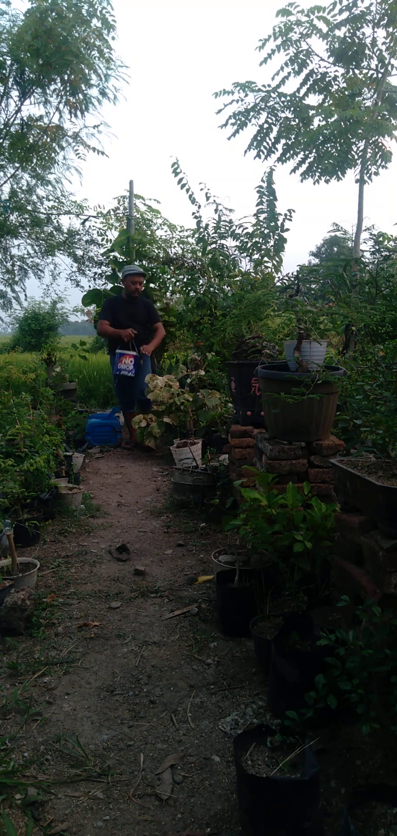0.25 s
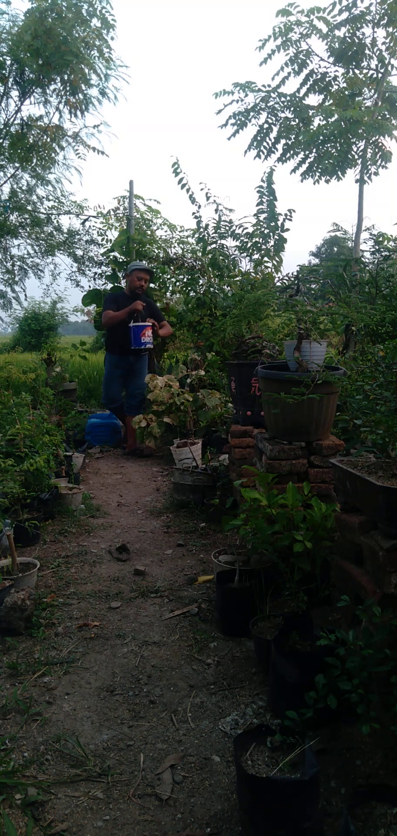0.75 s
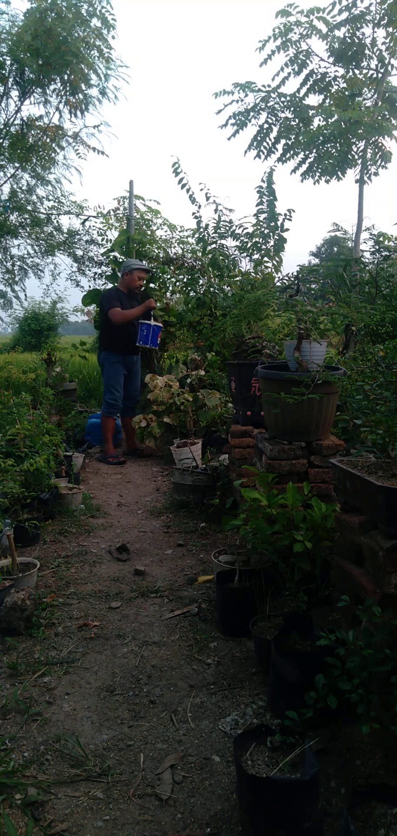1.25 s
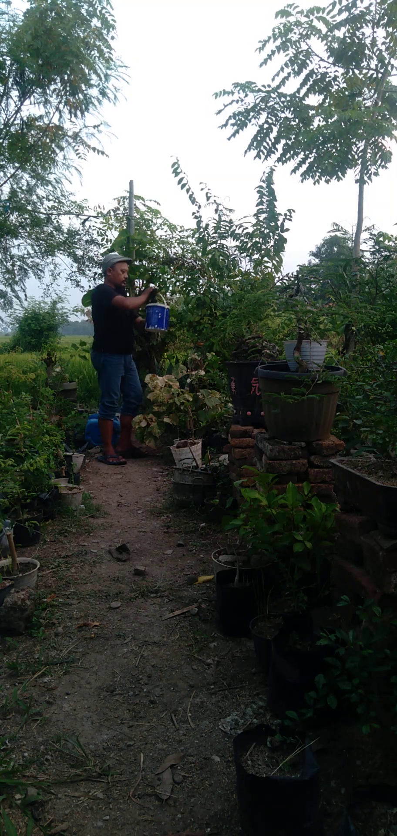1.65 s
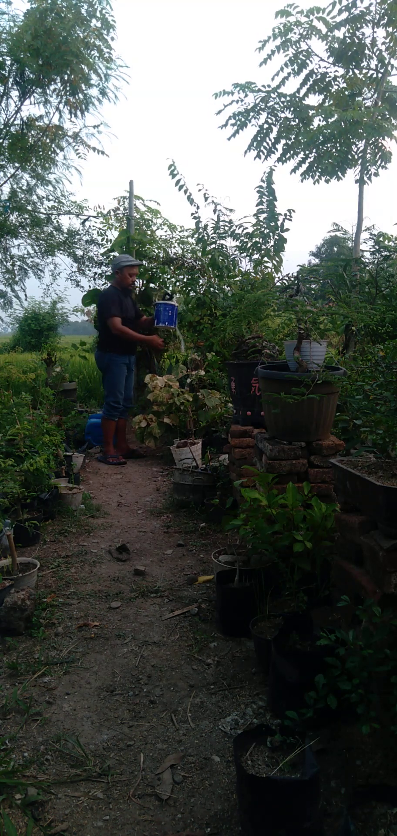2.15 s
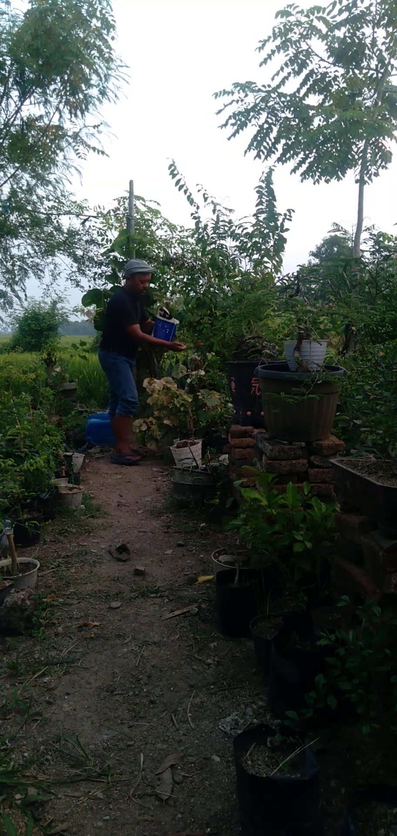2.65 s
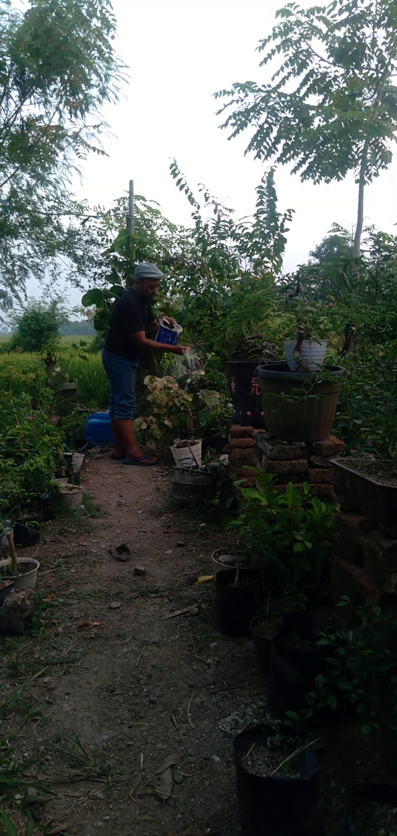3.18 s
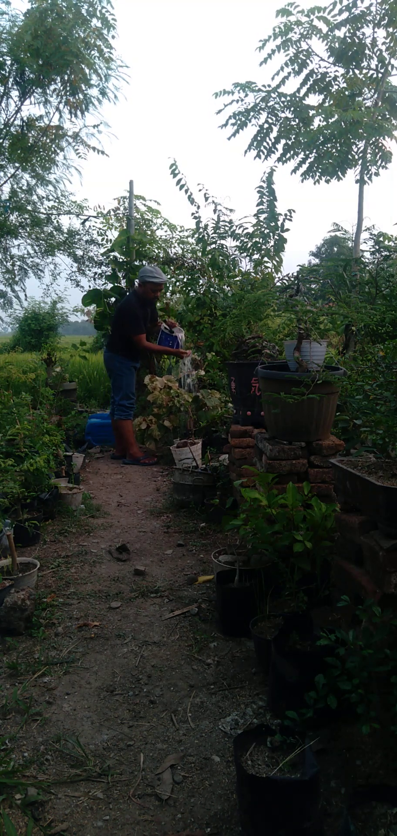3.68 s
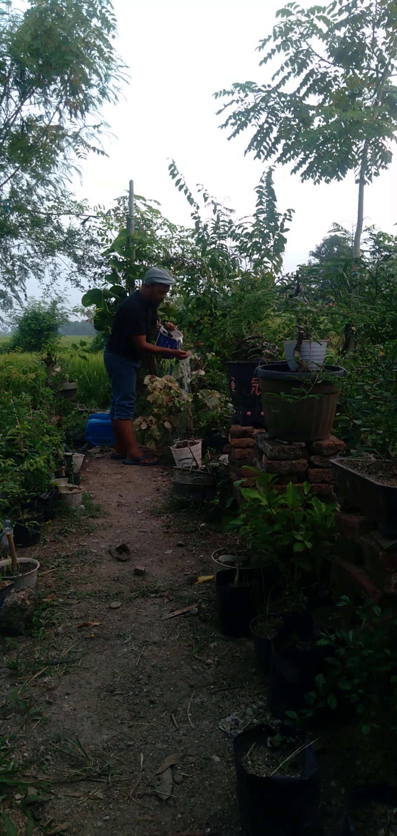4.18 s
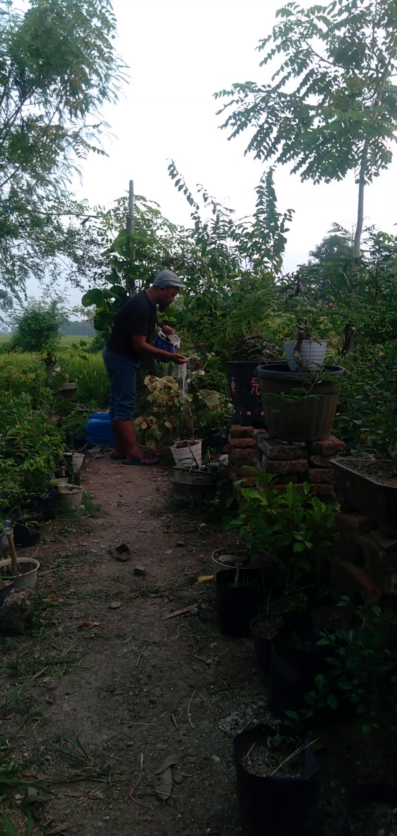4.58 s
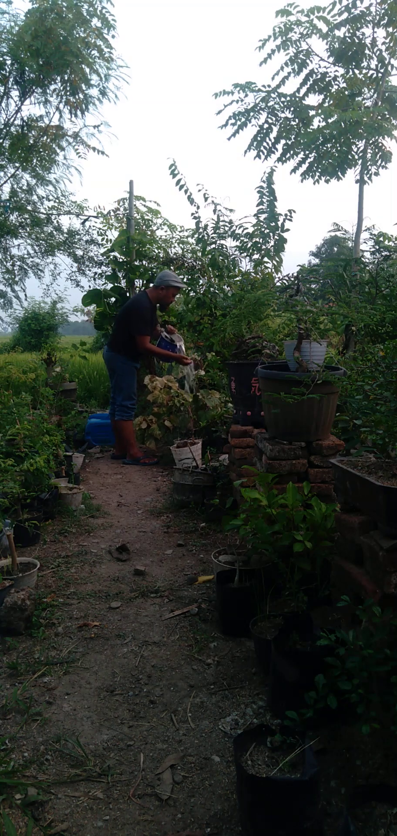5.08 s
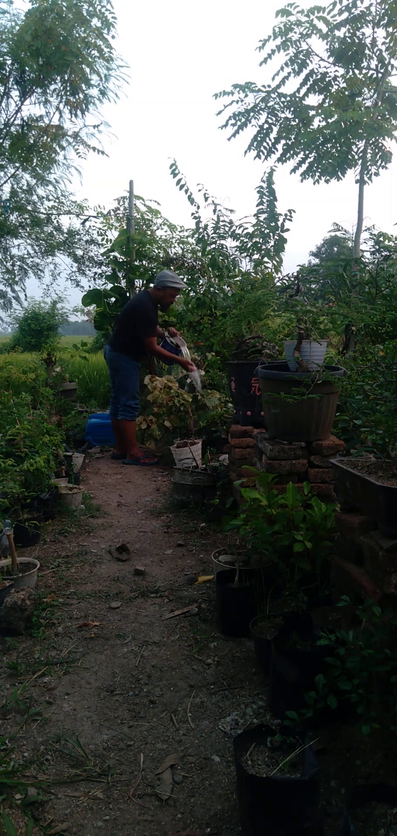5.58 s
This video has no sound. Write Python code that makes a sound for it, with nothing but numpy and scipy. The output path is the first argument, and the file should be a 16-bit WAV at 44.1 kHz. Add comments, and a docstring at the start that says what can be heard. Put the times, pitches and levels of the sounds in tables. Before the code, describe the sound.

Fast steady insect trilling outdoors, with a creaking bucket handle, a hollow plastic knock, and splashes of water pattering onto leaves and soil.

```python
"""A cricket close to the microphone chirps eight times a second while a second one buzzes higher and farther off.
Soft low gusts and a thin high insect hiss lie underneath in the garden.
A few metres away a plastic bucket knocks, its handle creaks, and water is tossed, then poured, over plants.
Crickets are rings struck by wing catches, water is dense random drop impacts, and the bucket is decaying
and squeaking tones; gusts, air and hiss are coloured noise."""
import sys
import numpy as np
from scipy import signal
from scipy.fft import rfft, irfft
from scipy.io import wavfile
from scipy.ndimage import uniform_filter1d

SR = 44100
rng = np.random.default_rng(int(sys.argv[2]) if len(sys.argv) > 2 else 0)


def digitize_waveform(pressure):
    """Quantize a signal to 16-bit integers and store it at the path in sys.argv[1].

    Rows of a 2-D input are taken as channels; values are limited to [-1, 1].
    """
    field = np.atleast_2d(pressure).T
    bounded = np.clip(field, -1, 1)
    quanta = np.round(bounded * 32767).astype(np.int16)
    wavfile.write(sys.argv[1], SR, quanta)


N = 257103
TIME = np.arange(N) / SR  # seconds


def amp(db):
    """Decibels to gain."""
    return 10 ** (np.asarray(db) / 20)


def evened(x):
    """Scales to rms 1."""
    return x / np.sqrt(np.mean(x ** 2) + 1e-20)


def colour(x, points):
    """Filters by a spectrum of (Hz, dB) points; beyond its ends the gain is -100 dB."""
    f, db = np.transpose(sorted(map(tuple, points)))
    hz = np.fft.rfftfreq(len(x), 1 / SR)
    gain = amp(np.interp(np.log(hz + 1), np.log(f), db, left=-100, right=-100))
    return irfft(rfft(x) * gain, len(x))


def noise(points):
    """Noise of rms 1 with the given spectrum."""
    return evened(colour(rng.standard_normal(N), points))


def wander(per_s):
    """Smooth chance of rms 1 that changes about per_s times a second."""
    lowpass = np.exp(-(np.fft.rfftfreq(N, 1 / SR) / per_s) ** 2)
    return evened(irfft(rfft(rng.standard_normal(N)) * lowpass, N))


def curves(rows):
    """Each column of a timed table, sample by sample."""
    s, *columns = np.transpose(rows)
    return [np.interp(TIME, s, column) for column in columns]


def add(mix, s, sound):
    """Lays a sound into the mix, starting at s."""
    at = round(s * SR)
    sound = sound[max(-at, 0):]
    part = mix[max(at, 0):][:len(sound)]
    part += sound[:len(part)]


def hump(middle, length):
    """A smooth bell-shaped swell of height 1."""
    return np.exp(-(2 * (TIME - middle) / length) ** 2)


def together(gains):
    """Independent sounds add in power."""
    return np.sqrt(sum(g ** 2 for g in gains))


def garden(x, wet_db, t60):
    """Adds the short scatter from pots, walls and foliage: sparse random echoes that die away."""
    t = np.arange(SR // 2) / SR
    sparse = rng.standard_normal(len(t)) * (rng.random(len(t)) < .1)
    taps = sparse * amp(-60 * t / t60) * (t > .003)
    return x + amp(wet_db) * signal.fftconvolve(x, evened(taps) / np.sqrt(len(t)))[:N]


# In one stroke the wing catches ever faster, and its force swells and fades about the middle.
FIRST_CATCH_S, FIRST_GAP_S, LAST_GAP_S = -.0368, .0098, .004
QUICKEN = .68  # share of the excess gap left after each catch
SWELL_S, FADE_S = 0.036, 0.024


def stroke(jitter_s=0.0003027, return_db=-21, count=27):
    """Times (s from the middle) and forces of the wing catches; a faint rasp remains as the wing slides back."""
    gaps = LAST_GAP_S + (FIRST_GAP_S - LAST_GAP_S) * QUICKEN ** np.arange(count)
    at = FIRST_CATCH_S + np.cumsum(gaps) - gaps + jitter_s * rng.standard_normal(count)
    force = np.exp(-np.where(at < 0, (at / SWELL_S) ** 4, (at / FADE_S) ** 2))
    return at, np.maximum(force, amp(return_db))


# Narrow tones that linger after each catch. Each row: pitch in Hz, relative level in dB.
LINGER = [(6336, -52.5), (6422, -45), (6481, -43.5), (6525, -46), (6568, -66.5), (6735, -67), (6826, -43),
          (6874, -48), (6918, -58.5)]


def lingering(x, ring_db=-2, t60=0.13):
    """Adds the narrow tones that ring on after each catch, as decaying resonances."""
    t = np.arange(SR // 4) / SR
    out = x.copy()
    for hz, db in LINGER:
        ring = amp(-60 * t / t60) * np.cos(2 * np.pi * hz * t)
        out += amp(db + ring_db) * evened(signal.oaconvolve(x, ring)[:N])
    return out


# Ring of the near cricket's wing. Each row: frequency in Hz, relative level in dB.
WING = [(5800, -52), (6000, -42), (6100, -26), (6180, -11), (6330, -2), (6480, 0), (6750, 0), (6920, -3),
        (7030, -21), (7150, -9), (7330, -30), (7600, -18), (7750, -32), (8000, -60)]
# Even beats, each at its own pace. Each row: first chirp in seconds, number of chirps, gap in seconds.
CHIRP_RUNS = [(-.005, 9, .1199), (1.071, 5, .1192), (1.67, 6, .1207), (2.39, 8, .1215), (3.368, 6, .1244),
              (4.106, 13, .121), (5.783, 1, .121)]
# Effort of the near cricket. Each row: time in seconds, relative chirp level in dB.
EFFORT = [(0, -38), (2.2, -38.5), (2.7, -39.5), (3.3, -39), (4.6, -40), (5.8, -40.5)]


def cricket(wing_hz=6550, slip_rad=0.95, level_db=-7.0, ring_s=0.00021, chorus_db=-48.5):
    """Every chirp repeats the same run of wing catches; each catch rings the wing for a moment."""
    t, out = np.arange(-2048, 5120) / SR, np.zeros(N)
    at, force = stroke()
    age = t - at[:, None]
    rings = np.exp(-.5 * (age / ring_s) ** 2 + 2j * np.pi * wing_hz * age)
    for first, gap_count, gap in CHIRP_RUNS:
        for s in first + gap * np.arange(gap_count):
            slip = rng.standard_normal(len(at))  # each catch slips in phase
            catches = force * np.exp(1j * slip_rad * slip)
            db = np.interp(s, *np.transpose(EFFORT)) + level_db
            add(out, s + t[0], amp(db) * evened(colour((catches @ rings).real, WING)))
    near = garden(lingering(out), wet_db=-13, t60=.3)
    return near + amp(chorus_db) * noise(WING)  # a steady wash in the same band


# Ring of the far cricket's wing. Each row: frequency in Hz, relative level in dB.
FAR_WING = [(7300, -30), (7520, -15), (7590, -7), (7690, -18), (7830, 1), (7890, -9), (7955, -1),
            (8030, -11), (8115, 0), (8200, -16), (8320, -45)]
# Where it falters, or swells if the drop is negative. Each row: middle in seconds, length in seconds, drop in dB.
FALTERS = [(0.046, 0.18, -2), (1.336, 0.06, 12), (2.076, 0.18, 6), (2.343, 0.086, 2), (2.765, .14, 11),
           (3.407, 0.18, 22), (4.23, 0.13, 16.5)]
FAR_DB, FAR_GROWTH_DB_PER_S = -49.5, 0.17  # level at the start; it slowly warms up
FAR_HZ, FAR_DRIFT_HZ = 8066, 73  # mean pitch, rms drift


def far_cricket(catch_hz=150, flutter_db=2.5):
    """A fluttering buzz of quick wing catches, each a decaying burst of a drifting tone, heard from afar."""
    falter = sum(drop * hump(s, length) for s, length, drop in FALTERS)
    db = FAR_DB + FAR_GROWTH_DB_PER_S * TIME + flutter_db * wander(9.7) - falter
    hz = FAR_HZ + FAR_DRIFT_HZ * wander(17)
    turns = np.cumsum(catch_hz * (1 + .15 * wander(50))) / SR
    ring = np.sin(2 * np.pi * np.cumsum(hz) / SR + 1.5 * wander(90))
    catches = np.exp(-(turns % 1) / .4) * ring * amp(3.5 * wander(30))
    return amp(db) * evened(colour(catches, FAR_WING))


def gust(points, steadiness=1.0):
    """Low noise whose swells are partly smoothed out."""
    x = noise(points)
    power = uniform_filter1d(x ** 2, SR // 16) + 1e-3
    return evened(x / power ** (steadiness / 2))


# Colours of the deep rumble and the hollow boom. Each row: frequency in Hz, relative level in dB.
RUMBLE = [(15, -11), (32, -23), (50, 3), (75, 6.5), (100, 2.5), (140, -34), (300, -65)]
BOOM = [(70, -50), (110, -18.5), (128, 3), (143, -6), (159, 5), (177, -11.5), (195, -2), (220, -16),
        (300, -28.5), (500, -78)]
# Soft low gusts. Each row: middle in seconds, length in seconds, deep rumble in dB, hollow boom in dB.
PUFFS = [(1.55, 0.16, -54.5, -64), (1.718, 0.071, -48.5, -60.5), (1.802, 0.11, -51, -70),
         (2.312, 0.095, -66, -54.5), (2.522, 0.052, -57, -65), (2.72, 0.11, -75, -55.5),
         (2.947, 0.092, -56, -43.5), (3.089, 0.08, -62, -47.5), (3.275, .12, -55, -49),
         (3.59, 0.081, -46.5, -45.5), (3.723, 0.14, -56, -50), (3.942, 0.087, -50, -49),
         (4.094, 0.13, -59, -50.5), (4.37, 0.083, -56, -58), (4.46, 0.18, -67, -49.5),
         (4.86, 0.089, -59, -50), (4.922, .09, -46.5, -59), (5.035, 0.18, -55.5, -48),
         (5.324, 0.11, -60, -46), (5.445, 0.22, -53.5, -59), (5.675, 0.057, -69, -54.5),
         (5.82, 0.12, -49.5, -57)]
CALM_RUMBLE_DB, CALM_BOOM_DB = -64.5, -69.5  # between the gusts
# Colours of the still air and the distant insects. Each row: frequency in Hz, relative level in dB.
AIR = [(150, -30), (250, -9.5), (285, -10.5), (324, -10), (579, -16), (1050, -17), (1210, -21), (1360, -22),
       (5500, -26), (7150, -49), (12100, -120)]
HISS = [(5410, -68), (9200, -19), (9800, -10), (10900, -1.5), (11600, -8), (12200, -30), (12500, -27),
        (13300, -10), (15800, -45)]
AIR_DB, HISS_DB = -76, -71  # air rms, hiss level about which it wavers


def outdoors():
    """Low gusts, still air and the hiss of distant insects, all shaped noise."""
    rumble = together([amp(CALM_RUMBLE_DB)] + [hump(s, length) * amp(db) for s, length, db, _ in PUFFS])
    boom = together([amp(CALM_BOOM_DB)] + [hump(s, length) * amp(db) for s, length, _, db in PUFFS])
    low = rumble * gust(RUMBLE) + boom * gust(BOOM)
    hiss = amp(HISS_DB + 1.3 * wander(27)) * noise(HISS)
    return low + amp(AIR_DB) * noise(AIR) + hiss


def drops(points, per_s, spread, clump_db):
    """Dense drop impacts of uneven size (spread in dB) that land in clumps; rms 1."""
    size = amp(spread * np.minimum(rng.exponential(1, N), 4)) * rng.choice([-1, 1], N)
    hits = size * (rng.random(N) < per_s / SR) * amp(clump_db * wander(33))
    return evened(colour(garden(hits, wet_db=-3.5, t60=0.24), points))


def patchy(x, patch_db, size):
    """Splashes shift in colour from moment to moment, by smooth random gains in time and pitch; rms 1."""
    z = signal.stft(x, nperseg=size, noverlap=size * 3 // 4)[2]
    smoothing = np.outer(np.hanning(7), np.hanning(11))
    field = signal.fftconvolve(rng.standard_normal(z.shape), smoothing, "same")
    shifted = signal.istft(z * amp(patch_db * evened(field)), nperseg=size, noverlap=size * 3 // 4)[1]
    return evened(shifted[:N])


# Small flicks of water. Each row: start in seconds, level in dB, fall time t60 in seconds.
FLICKS = [(.462, -46.5, 0.33), (1.251, -53, 0.27), (1.561, -41, 0.31), (3.032, -51, .25)]
# Colour of the flicks. Each row: frequency in Hz, relative level in dB.
FLICK = [(2500, -34), (4000, -21), (4700, -7), (5400, -6), (7000, 1), (9000, -8), (10800, -39), (12200, -8),
         (14300, 9), (15800, 0)]


def flicks(rise_s=0.0061):
    """A few drops scatter at once and patter out."""
    level = np.zeros(N)
    for s, db, t60 in FLICKS:
        age = TIME - s
        level += amp(db - 60 * np.maximum(age, 0) / t60) * np.clip(age / rise_s, 0, 1)
    return level * patchy(drops(FLICK, per_s=5000, spread=3.2, clump_db=5.0), patch_db=7, size=1024)


def bubble(hz, t60=0.15, rise=0.7):
    """A pocket of air rings and climbs in pitch as it nears the surface."""
    t = np.arange(SR // 6) / SR
    tone = np.sin(2 * np.pi * hz * t * (1 + rise * t / 2))
    return tone * amp(-60 * t / t60) * (1 - np.exp(-t / 0.0019))


# Knocks and plops in the bucket. Each row: start in seconds, relative peak in dB, pitch in Hz.
KNOCKS = [(0.476, -50, 1224), (0.545, -55.5, 1137), (1.579, -57, 1435), (1.643, -58, 1380),
          (1.761, -56.5, 1463), (2.279, -52, 1150), (2.46, -32, 1352), (2.799, -42.5, 1404),
          (3.078, -54.5, 1330), (3.214, -51, 1216), (3.307, -47, 1150), (3.589, -44, 693),
          (4.075, -48, 1720), (4.202, -48, 1397), (5.125, -53.5, 1020), (5.4, -48, 1411)]
# Modes of the plastic. Each row: multiple of the pitch, relative level in dB, t60 in seconds.
BUCKET = [(0.273, -19, 0.052), (.55, -33, 0.061), (0.921, -4.5, 0.075), (1.002, -0.5, 0.12),
          (1.078, -7, 0.08), (1.298, -16, 0.07)]
# Glugs of water leaving the bucket. Each row: start in seconds, level in dB, starting pitch in Hz.
GLUGS = [(2.462, -53.5, 324), (2.68, -58, 381), (3.45, -51, 343), (3.518, -53, 350), (3.629, -54, 352),
         (3.961, -53, 344), (4.151, -49, 309), (4.229, -50.5, 320), (4.292, -48.5, 339), (5.101, -52, 288),
         (5.449, -58, 345)]
# Squeaks of the handle. Each row: start in seconds, end in seconds, start in Hz, end in Hz, level in dB.
SQUEAKS = [(1.19, 1.415, 2285, 2305, -65), (1.178, 1.35, 1520, 1550, -66), (1.2, 1.31, 680, 880, -77),
           (.52, .57, 1500, 1650, -72), (1.33, 1.494, 1180, 1240, -68), (1.39, 1.5, 1800, 2200, -78.5),
           (1.35, 1.5, 2350, 2430, -74), (1.44, 1.49, 2830, 2880, -83), (1.25, 1.32, 4560, 4500, -75)]


def bucket(knock_db=-2, waver=0.007):
    """Dull knocks ring the plastic, water glugs, and the handle squeaks on wavering tones."""
    t, out = np.arange(SR // 4) / SR, np.zeros(N)
    for s, db, pitch in KNOCKS:
        ring = np.zeros(len(t))
        for multiple, mode_db, t60 in BUCKET:
            tone = np.sin(2 * np.pi * (pitch * multiple * t + rng.random()))
            ring += amp(mode_db - 60 * t / t60) * tone
        ring *= 1 - np.exp(-t / 0.0012)  # soft onset
        add(out, s, amp(db + knock_db) * ring / abs(ring).max())
    for s, db, pitch in GLUGS:
        add(out, s, amp(db) * bubble(pitch))
    slip, grip = wander(140), wander(102)
    for start, end, from_hz, to_hz, db in SQUEAKS:
        n, at = max(round((end - start) * SR), 64), round(start * SR)
        hz = np.linspace(from_hz, to_hz, n) * (1 + waver * slip[at:at + n])
        swell = signal.windows.tukey(n, .7) * amp(2.6 * grip[at:at + n])
        add(out, start, amp(db) * evened(np.sin(2 * np.pi * np.cumsum(hz) / SR) * swell))
    return garden(out, wet_db=-7, t60=.22)


SPLASH_RISE_S, SPLASH_T60_S, SPLAT_T60_S = 0.016, 0.29, .27


def burst(start, hold, t60):
    """Envelope of landing water: a 20 dB climb per SPLASH_RISE_S, a hold, and a fall as it drips away."""
    age = TIME - start
    return amp(20 * np.minimum(age / SPLASH_RISE_S - 1, 0) - 60 * np.maximum(age - hold, 0) / t60)


# Colour of water on soil, also of its bubbles. Each row: frequency in Hz, relative level in dB.
SPLAT = [(200, 14), (330, -2), (480, 0), (720, 3), (950, 0.5), (1300, 7.5), (1700, 9), (2100, 8.5),
         (3000, -3.5), (3900, -4)]


def bubbles(count=520):
    """Small bubbles of random size ring all through the puddle; rms 1."""
    out = np.zeros(N)
    for when, size, strength, life in rng.random((count, 4)):
        sound = bubble(350 * 8 ** size, t60=.03 + .1 * life, rise=3 * life)
        add(out, when * N / SR, amp(14 * strength) * sound)
    return evened(colour(out, SPLAT))


# Colours of fine spray, leaf spatter and a bright top hiss. Each row: frequency in Hz, relative level in dB.
SPRAY = [(5500, -5.5), (7000, -1), (7550, -7), (8100, -3.5), (8600, -0.5), (9500, -6), (10300, -36),
         (11300, -21.5), (12100, -3.5), (13500, -2.5), (15800, 1)]
SPATTER = [(1500, -48), (2100, -11), (2700, -3), (3400, -1), (4200, 3), (5500, 5.5), (7000, 4.5),
           (7550, -2.5), (8500, -13), (10000, -11)]
BRIGHT_TOP = [(8000, -14), (9500, 14), (10200, 7), (10900, -17), (11600, 9), (13000, -6)]
# Handfuls of water landing, and surges in the stream.
# Each row: start in seconds, hold in seconds, relative fine spray in dB, relative spatter on leaves in dB.
SPLASHES = [(2.349, 0.14, -52.5, -66), (2.471, 0.059, -40.5, -48), (2.605, .08, -40.5, -44.5),
            (2.705, 0.071, -49, -53), (2.783, 0.026, -48.5, -47), (3.055, 0.056, -53.5, -63),
            (3.088, 0.093, -54, -53), (3.339, 0.14, -61.5, -65), (3.445, .035, -45.5, -44),
            (3.557, .03, -48, -55), (3.806, 0.035, -44.5, -48), (3.968, 0.044, -39, -43),
            (4.064, 0.016, -38.5, -40), (4.19, .04, -46, -49.5), (4.23, 0.039, -38, -62),
            (4.768, 0.12, -41.5, -48.5), (4.869, 0.066, -52, -39), (4.997, 0.016, -32.5, -65),
            (5.047, 0.018, -37.5, -43.5), (5.394, 0.022, -46, -48), (5.417, 0.025, -43, -41),
            (5.625, 0.025, -52.5, -48)]
# The steady stream from the tipped bucket. # Each row: time in seconds, relative fine spray in dB, relative
# spatter on leaves in dB, bright top hiss in dB.
STREAM = [(3.4, -99, -80, -110), (3.5, -48, -57.5, -79), (3.68, -51.5, -50.5, -84),
          (3.9, -47.5, -48.5, -70), (4.45, -43, -47.5, -48.5), (4.56, -44.5, -53.5, -68),
          (4.68, -39.5, -53.5, -52), (5.05, -52, -51, -45), (5.17, -42, -50.5, -58),
          (5.37, -45.5, -57, -69), (5.5, -42, -48, -48), (5.82, -41.5, -48.5, -68)]
# Heavy water hitting the soil. Each row: start in seconds, hold in seconds, relative level in dB.
SPLATS = [(2.28, 0.11, -76.5), (2.449, 0.021, -52), (2.538, 0.053, -68), (2.7, .08, -65),
          (2.765, 0.074, -54), (3.066, 0.12, -64.5), (3.448, 0.11, -69), (3.593, 0.26, -67.5),
          (3.8, .27, -70), (4.131, 0.14, -59), (4.427, 0.07, -65), (5.093, 0.079, -71), (5.22, .05, -63),
          (5.381, 0.068, -57), (5.55, 0.24, -70.5)]


def water(spray_db=2.5, spatter_db=3.0, splat_db=-1, bubble_db=-5):
    """Separate splashes, then a steady stream: drop impacts as spray, leaf spatter and soil splat, with a
    bright hiss at the top."""
    spray, spatter, bright = amp(curves(STREAM)) * (TIME > STREAM[0][0])
    landings = [(burst(s, hold, SPLASH_T60_S), a, b) for s, hold, a, b in SPLASHES]
    spray = together([spray] + [shape * amp(db) for shape, db, _ in landings])
    spatter = together([spatter] + [shape * amp(db) for shape, _, db in landings])
    splat = together(burst(s, hold, SPLAT_T60_S) * amp(db) for s, hold, db in SPLATS)
    fine = patchy(drops(SPRAY, per_s=6000, spread=3.2, clump_db=2.2), patch_db=2.7, size=256)
    leaves = patchy(drops(SPATTER, per_s=4500, spread=3.6, clump_db=2.0), patch_db=2.6, size=512)
    soil = patchy(drops(SPLAT, per_s=600, spread=2.8, clump_db=0.5), patch_db=5.5, size=1024)
    soil = amp(splat_db) * soil + amp(bubble_db) * bubbles()
    glare = drops(BRIGHT_TOP, per_s=1500, spread=3.5, clump_db=4)
    on_plants = amp(spray_db) * spray * fine + amp(spatter_db) * spatter * leaves
    return on_plants + splat * soil + bright * glare


# Water sloshing round the tilted bucket. Each row: middle in seconds, length in seconds, level in dB.
SLOSHES = [(2.353, 0.084, -63), (2.7, 0.7, -67), (3.157, 0.36, -67), (3.672, 0.43, -60), (3.986, 0.29, -79)]
# Resonances of the sloshing. Each row: frequency in Hz, relative level in dB.
SLOSH = [(950, -20), (1170, -2), (1290, 3.5), (1400, -11), (1620, -5), (1750, -27.5), (1900, -10.5),
         (2150, -39)]


def sloshing():
    """Moving water stirs a few shifting resonances of the bucket."""
    level = together(hump(s, length) * amp(db) for s, length, db in SLOSHES)
    return level * patchy(drops(SLOSH, per_s=900, spread=1.5, clump_db=0.5), patch_db=8.5, size=2048)


# Big drops slapping leaves. Each row: start in seconds, direct peak in dB, main pitch in Hz, t60 in seconds.
SLAPS = [(3.4747, -33, 4200, 0.02), (3.61, -26, 6800, 0.012), (3.713, -30, 6700, 0.012),
         (3.845, -30, 6000, 0.012), (4.079, -25, 6200, 0.025), (4.0946, -17, 6400, 0.03),
         (4.102, -23, 6700, 0.04), (4.6346, -26, 6900, 0.015), (4.649, -16, 6100, 0.009),
         (4.824, -19, 8500, 0.016), (4.834, -24, 8200, 0.025), (4.897, -35, 4500, 0.02),
         (4.929, -23, 5500, 0.025), (4.944, -28, 6000, 0.015), (5.008, -26, 7000, 0.016),
         (5.0315, -15, 13000, 0.009), (5.073, -25, 7500, 0.03)]


def slaps(width_octaves=0.28, click_db=-17):
    """Big drops crack on leaves: short noise bursts, each around its own pitch, with a bright click."""
    t, out = np.arange(2048) / SR, np.zeros(N)
    hz = np.fft.rfftfreq(len(t), 1 / SR) + 1
    click = amp(click_db) * hz ** 2 / (hz ** 2 + 4000 ** 2)
    for s, db, pitch, t60 in SLAPS:
        shape = np.exp(-.5 * (np.log2(hz / pitch) / width_octaves) ** 2) + click
        hit = rng.standard_normal(len(t)) * amp(-60 * t / t60) * np.minimum(t / 0.0011, 1)
        crack = irfft(rfft(hit) * shape)
        add(out, s, amp(db) * crack / abs(crack).max())
    return garden(out, wet_db=-3.5, t60=0.13)


def scene():
    """All sources at one microphone, the same in both channels."""
    mono = cricket() + far_cricket() + outdoors() + flicks() + bucket() + water() + sloshing() + slaps()
    return np.array([mono, mono])


EDGE_HZ = 15800


def record(dry):
    """The recorder's band limit: a steep low-pass at EDGE_HZ."""
    lowpass = signal.firwin(511, EDGE_HZ, window=("kaiser", 9), fs=SR)
    return signal.oaconvolve(dry, lowpass[None], "same")


dry = scene()
out = record(dry)
digitize_waveform(out)
```